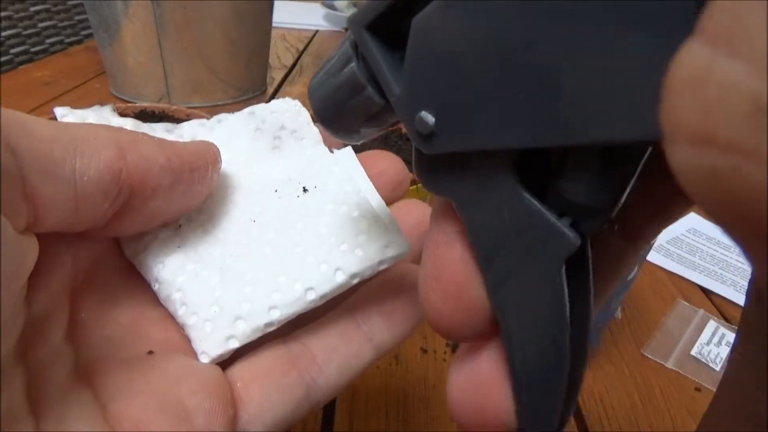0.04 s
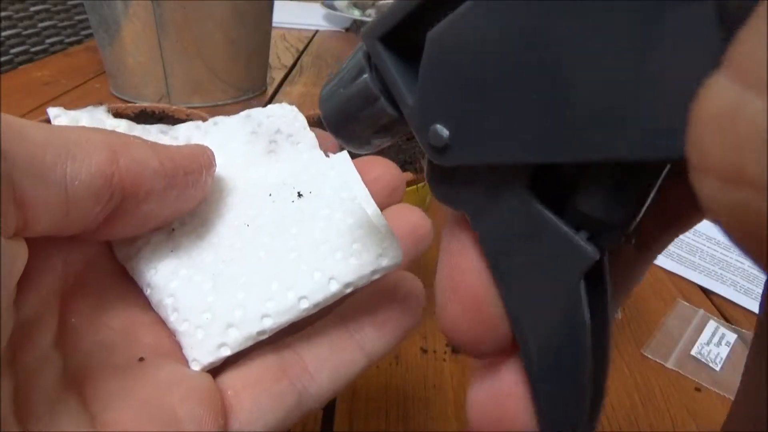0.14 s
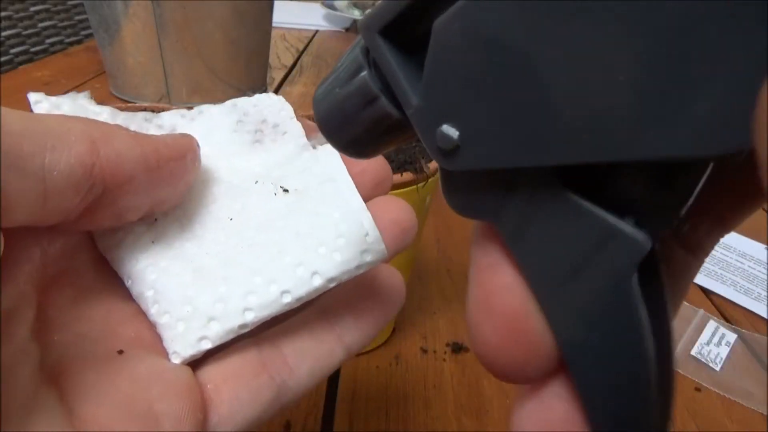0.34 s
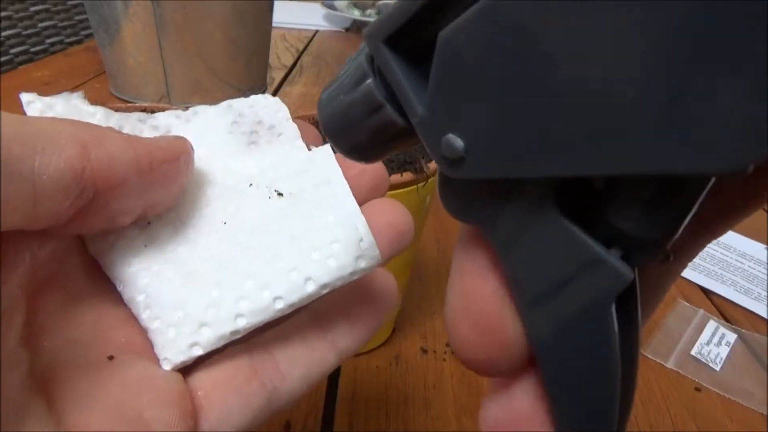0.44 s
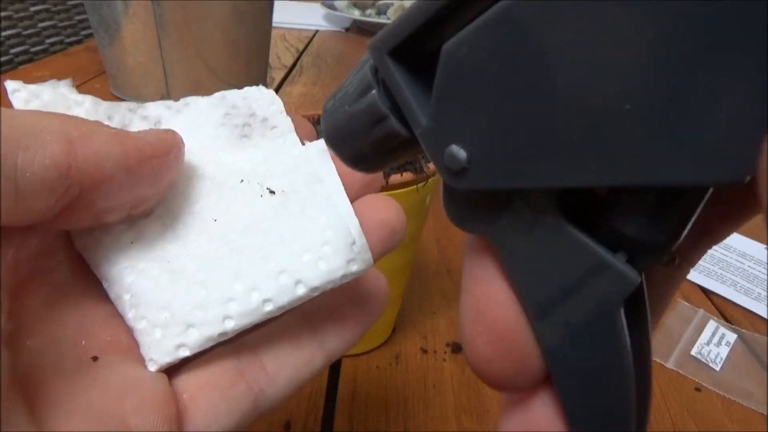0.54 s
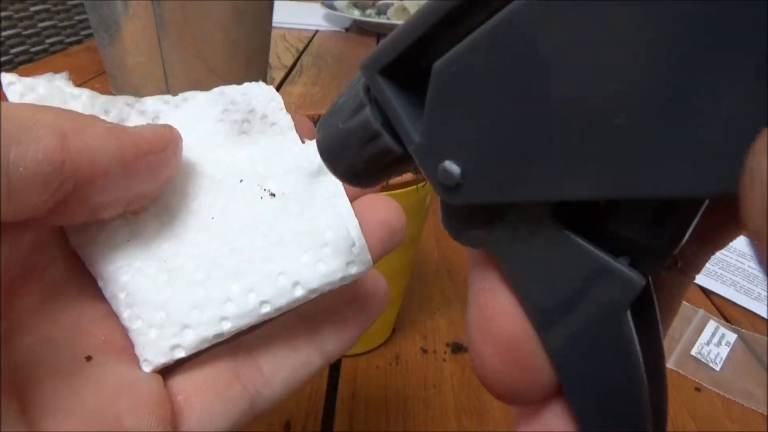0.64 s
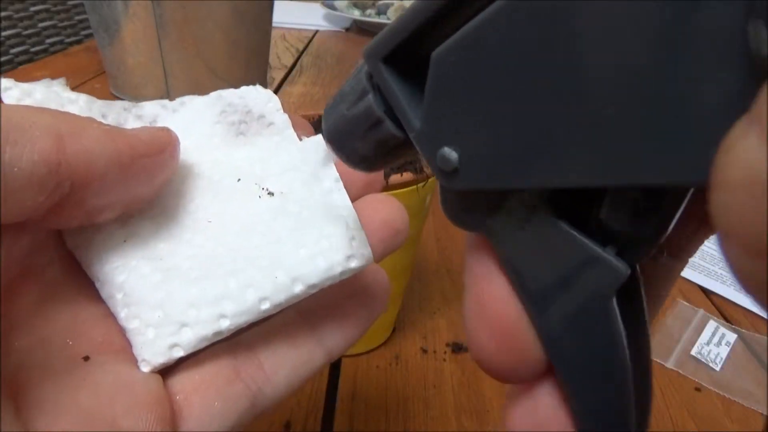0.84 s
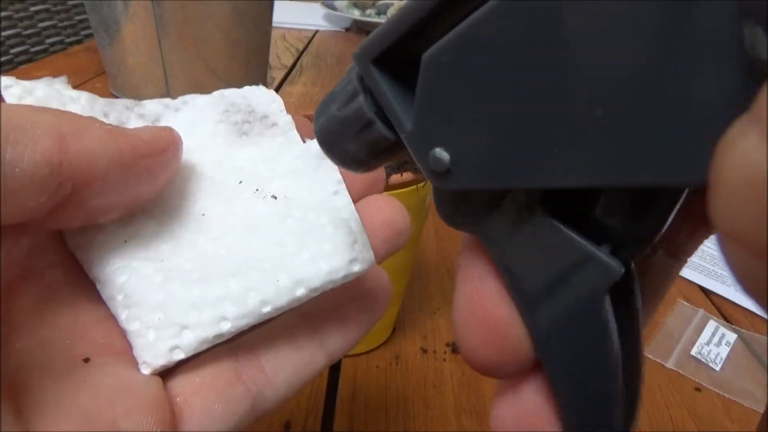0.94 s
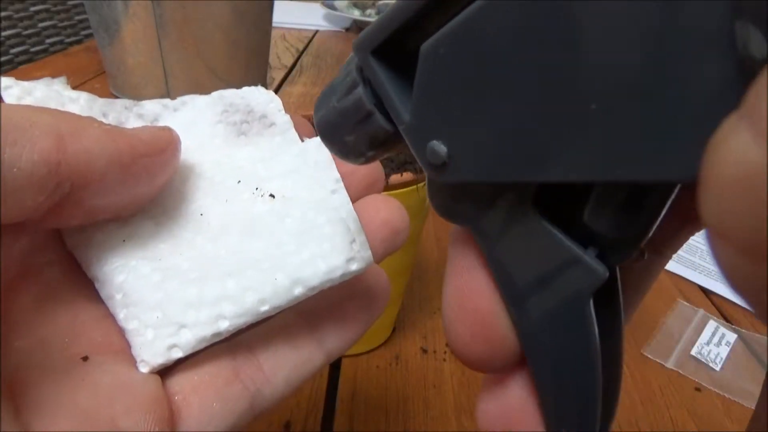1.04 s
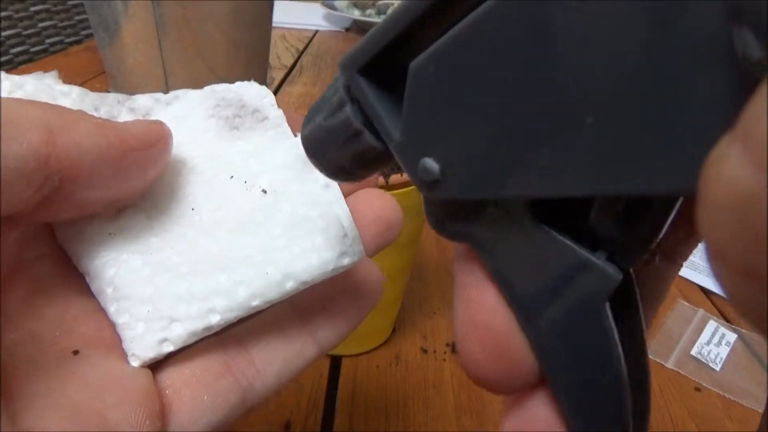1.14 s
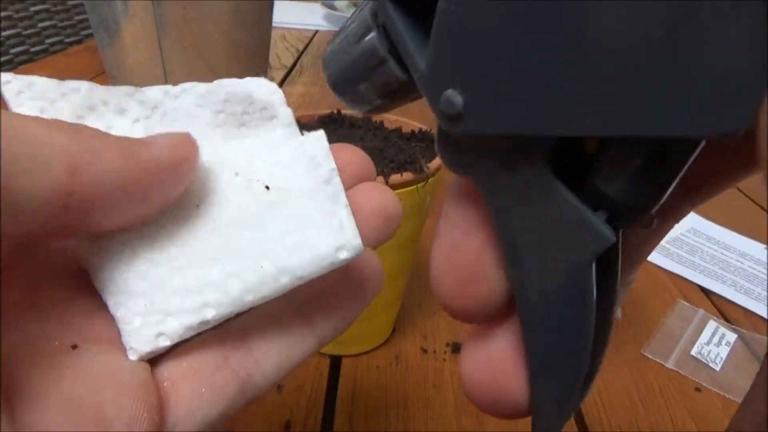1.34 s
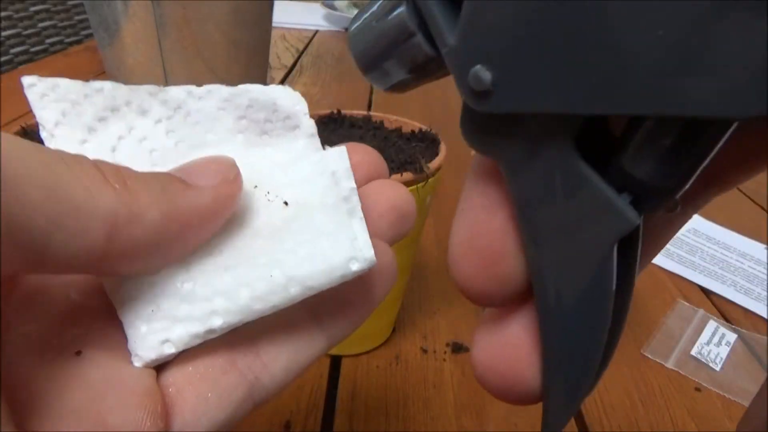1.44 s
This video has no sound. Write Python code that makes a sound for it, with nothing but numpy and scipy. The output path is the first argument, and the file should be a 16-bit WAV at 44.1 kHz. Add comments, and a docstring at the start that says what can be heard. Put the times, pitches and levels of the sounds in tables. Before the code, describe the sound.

A hand sprayer is pumped four times, close to the microphone, the first squirt strongest and longest; crisp mist hits paper towel, the trigger clicks and thumps back, ending with a brief chirp and faint refill hiss.

```python
"""Spray bottle onto a paper towel

Small room, close by: the hiss of an earlier squirt dies away, then a trigger bottle is pumped four times
at a paper towel. Pulls thump the piston (damped sines), spit (noise snaps) and hiss as droplet noise for
mist and patter. The plastic trigger rasps in noise bursts; at last it squeaks home as a sagging chirp of
partials and the pump sucks in water as soft noise. Faint reverberation and room tone lie behind."""
import sys
import numpy as np
from scipy import signal
from scipy.io import wavfile
from scipy.ndimage import uniform_filter1d

SR = 44100
rng = np.random.default_rng(int(sys.argv[2]) if len(sys.argv) > 2 else 0)


def transcribe(signal):
    """Save signal, clipped to [-1, 1], as a 16-bit WAV file at the path in sys.argv[1]."""
    frames = np.atleast_2d(signal).T
    limited = np.clip(frames, -1, 1)
    pcm = np.round(limited * 32767).astype(np.int16)
    wavfile.write(sys.argv[1], SR, pcm)


N = 66150
T = np.arange(N) / SR
ONSET_S = 0.00073
CLICK_DECAY_S = 0.0024


def amp(db):
    """Decibels to gain."""
    return 10 ** (np.asarray(db) / 20)


def unit(x):
    """Scales to rms 1."""
    return x / np.sqrt(np.mean(x ** 2) + 1e-20)


def noise():
    """White noise of rms 1."""
    return rng.standard_normal(N)


def random_signs():
    """Flat-spectrum noise of constant size and random sign."""
    return rng.choice([-1, 1], N)


def colour(x, points, keep_power=True):
    """Minimum-phase filter through (frequency [Hz], level [dB]) points."""
    hz, db = np.transpose(points)
    bins_hz = abs(np.fft.fftfreq(4096, 1 / SR)) + 1
    gain = amp(np.interp(np.log(bins_hz), np.log(hz), db))
    if keep_power:
        gain = unit(gain)
    # The Hilbert transform of the log gain gives the phase of a causal filter
    response = np.exp(np.conj(signal.hilbert(np.log(gain))))
    taps = np.fft.ifft(response).real[:2048]
    return signal.oaconvolve(x, taps)[:N]


def swell(start, rise, hold, fall_db_per_s, open_db):
    """Flow that opens at open_db, rises to full, holds and falls away."""
    t = T - start
    rise_db = open_db * np.clip(1 - t / rise, 0, 1) ** 1.17
    fall_db = fall_db_per_s * np.maximum(t - rise - hold, 0)
    return np.clip(t / 0.002, 0, 1) * amp(rise_db - fall_db)


def burst(start, hold, decay):
    """Quick onset, short hold, exponential decay."""
    t = T - start
    return np.clip(t / ONSET_S, 0, 1) * np.exp(-np.maximum(t - hold, 0) / decay)


def ring(start, modes):
    """Damped modes struck once, each with its own t60 and a random phase."""
    t = np.maximum(T - start, 0)
    total = 0
    for hz, db, t60 in modes:
        total = total + amp(db - 60 * t / t60) * np.sin(2 * np.pi * (hz * t + rng.random()))
    return np.minimum(t / .0003, 1) * total


DROPS_PER_S, DROP_SPREAD_DB, DROP_SHARE, FLUTTER_DB = 6000, 3.5, 0.37, 1.0  # share is of power


def droplets():
    """Smooth hiss with dense impacts of uneven size, fluttering with the flow."""
    impacts = (rng.random(N) < DROPS_PER_S / SR) * random_signs()
    drops = impacts * amp(DROP_SPREAD_DB * np.minimum(rng.exponential(1, N), 4))
    flutter = unit(uniform_filter1d(noise(), size=200))
    mixture = np.sqrt(DROP_SHARE) * unit(drops) + np.sqrt(1 - DROP_SHARE) * noise()
    return mixture * amp(FLUTTER_DB * flutter)


# Pulls: (start [s], rise [s], hold [s], mist level [dB], mist fall [dB/s],
#         patter lag [s], patter level [dB], patter fall [dB/s])
SQUIRTS = [(0.212, 0.04, 0.082, -17, 251, .006, -22.5, 157),
           (0.589, 0.035, 0.046, -26.5, 235, 0.012, -25.5, 300),
           (0.847, 0.049, 0.033, -21, 235, 0.02, -23.5, 210),
           (1.107, 0.035, 0.03, -24, 210, .014, -25.5, 282)]
# Spectrum of mist at the nozzle: (frequency [Hz], level [dB])
MIST_SPECTRUM = [(300, -56), (3000, -11), (6500, -11.5), (8200, -11), (9200, -4), (10200, -2), (11800, 0.5),
                 (13200, -2), (14100, -1.5), (15000, -6.5), (16000, -18)]
# Spectrum of drops on the paper: (frequency [Hz], level [dB])
PATTER_SPECTRUM = [(60, -23), (170, -17), (350, -8), (900, -5.5), (2000, -4), (2650, 0), (3100, -2.5),
                   (3600, 1.5), (4250, 1.5), (5000, -7), (5800, -8), (6700, -20), (7900, -4.5),
                   (10000, -22), (16000, -14.5)]
# Spectrum of sputter and of the spits below: (frequency [Hz], level [dB])
SPIT_SPECTRUM = [(60, -36), (200, -21), (2000, -8.5), (4300, -9), (6500, -24), (9500, -3), (12500, 7.5),
                 (14500, 1.5), (16000, -4)]
MIST_OPEN_DB, PATTER_OPEN_DB = -28.5, -22.5  # opening level, relative to full flow
PATTER_RISE_SHARE = 0.71  # of the mist's rise time
VALVE_TAIL_S, VALVE_SHUT_S = 0.092, 0.022  # extra time open, then the decay
SPUTTER_PER_S, SPUTTER_DB, SPUTTER_DECAY_S, SPUTTER_FALL_DB_PER_S = 130, -16, .0007, 110


def spray():
    """Pump pressure drives bright mist at the nozzle and patter on paper; the weakening jet sputters."""
    mist, patter, weak_jet = 0, 0, 0
    for start, rise, hold, mist_db, mist_fall, lag, patter_db, patter_fall in SQUIRTS:
        valve = burst(start, rise + hold + VALVE_TAIL_S, VALVE_SHUT_S)
        mist_flow = swell(start, rise, hold, mist_fall, MIST_OPEN_DB)
        mist = mist + valve * amp(mist_db) * mist_flow
        landing = swell(start + lag, rise * PATTER_RISE_SHARE, hold, patter_fall, PATTER_OPEN_DB)
        patter = patter + valve * amp(patter_db) * landing
        # Slower fall than the mist, so the sputter outlasts it
        weak_flow = swell(start, rise + hold, 0, SPUTTER_FALL_DB_PER_S, MIST_OPEN_DB)
        weak_jet = weak_jet + valve * amp(mist_db + SPUTTER_DB) * weak_flow
    hiss = colour(mist * droplets(), MIST_SPECTRUM) + colour(patter * droplets(), PATTER_SPECTRUM)
    strikes = 1. * (rng.random(N) < SPUTTER_PER_S / SR)
    sputter = signal.lfilter([1], [1, -np.exp(-1 / (SPUTTER_DECAY_S * SR))], strikes)
    return hiss + colour(weak_jet * sputter * noise(), SPIT_SPECTRUM)


# Large drops spat from the nozzle, and other wet snaps: (time [s], level [dB], decay [s])
SPITS = [(.168, -21.5, 0.00084), (0.2111, -18.5, .001), (0.233, -16, .002), (.3527, -7.5, 0.0015),
         (0.3621, -19, 0.00087), (0.368, -14, .0012), (0.392, -15, .001), (.405, -26, 0.0015),
         (.4605, -37, 0.00091), (0.559, -34, .001), (0.5936, -17.5, .002), (.603, -29, 0.0063),
         (.724, -28, 0.0013), (0.7581, -16, 0.00067), (.859, -7.5, 0.00093), (.868, -15, 0.00075),
         (0.97, -22, 0.0016), (1.138, -20, 0.0026), (1.2293, -24, 0.0014), (1.2384, -27, .001),
         (1.2487, -12.5, 0.00086), (1.394, -22, .0014)]


def spits():
    """Large drops and other wet snaps: very short bursts of bright noise."""
    snaps = sum(amp(db) * burst(start, ONSET_S, decay) for start, db, decay in SPITS)
    return colour(snaps * random_signs(), SPIT_SPECTRUM)


# Piston reaching the ends of its travel: (time [s], level [dB], pitch [Hz], decay [s])
THUMPS = [(.163, -38, 218, .012), (0.197, -28.5, 260, .003), (0.395, -35, 200, 0.0044),
          (.587, -22, 235, 0.0021), (.751, -26.5, 201, 0.0026), (.863, -28.5, 192, 0.013),
          (0.8734, -29.5, 152, 0.011), (.994, -27, 200, .003), (1.112, -25, 224, 0.0044),
          (1.241, -26, 225, 0.0029), (1.397, -35.5, 178, 0.012)]
# Body of the bottle: (frequency [Hz], level [dB])
BOTTLE_BODY = [(30, -4.5), (70, 0.5), (140, -1.5), (250, 0.5), (500, 0), (1500, -13)]
THUMP_RISE_S, THUMP_SLOSH = 0.00088, 0.35  # slosh is relative to the tone


def piston():
    """Low thumps of the bottle, damped sines roughened by the water in it."""
    low_pass = signal.butter(2, 400, fs=SR, output="sos")
    slosh = unit(signal.sosfilt(low_pass, noise()))
    thumps = 0
    for start, db, hz, decay in THUMPS:
        t = np.maximum(T - start, 0)
        envelope = np.minimum(t / THUMP_RISE_S, 1) * np.exp(-t / decay)
        tone = np.sin(2 * np.pi * hz * t)
        thumps = thumps + amp(db) * envelope * (tone + THUMP_SLOSH * slosh)
    return colour(thumps, BOTTLE_BODY, keep_power=False)


# Clicks and rasps of the trigger: (time [s], level [dB], length of the slip [s])
CLICKS = [(0.1667, -30, 0.00092), (0.1928, -34, 0.0011), (0.2007, -28.5, 0.0051), (0.4034, -22.5, .001),
          (0.4109, -22, 0.0025), (0.5578, -36, 0.0006), (0.755, -26.5, 0.0021), (0.763, -23, 0.0063),
          (0.78, -38.5, 0.0083), (0.799, -38, .001), (0.804, -37, 0.00086), (.859, -21, 0.00079),
          (0.867, -21.5, 0.00083), (0.9799, -26.5, 0.00044), (1.0018, -23, 0.0013), (1.0092, -21.5, 0.0059),
          (1.024, -37, 0.0016), (1.045, -29, 0.0017), (1.115, -26, .001), (1.2477, -24, 0.0026),
          (1.2547, -21.5, 0.0065)]
# Dull taps of the grip: (time [s], level [dB])
TAPS = [(0.053, -20.5), (0.1006, -23.5), (.405, -24), (.515, -37), (.593, -28), (1.121, -25.5),
        (1.357, -30.5), (1.395, -32)]
# Resonances of the grip: (frequency [Hz], level [dB], t60 [s])
TAP_MODES = [(450, -15, .006), (900, -17, 0.0045), (1290, 3, 0.0087), (1820, -13, 0.0045)]
# Resonances of the spring: (frequency [Hz], level [dB], t60 [s])
PING_MODES = [(2770, 1, .019), (3610, -2.5, 0.022), (5373, -1, 0.018), (7040, -7, .014), (9500, -18, .011),
              (11620, -1, 0.0099), (12700, -10, .011)]
# Spectrum of plastic slipping on plastic, also in the squeak: (frequency [Hz], level [dB])
PLASTIC_SPECTRUM = [(150, -13.5), (700, -8.5), (1800, -9), (2600, -0.5), (3400, -5.5), (4400, 1.5),
                    (5300, -6), (7800, -9), (9000, -5), (11500, -8.5), (13500, -14), (16000, -18)]
PING_S, PING_DB, PING_SCRAPE_S, PING_SCRAPE_DB = .0798, -23, 0.0026, -30.5


def trigger():
    """Plastic slips on plastic; the grip taps and the spring scrapes and pings."""
    slips = sum(amp(db) * burst(start, length, CLICK_DECAY_S) for start, db, length in CLICKS)
    spring_scrape = amp(PING_SCRAPE_DB) * burst(PING_S, PING_SCRAPE_S, CLICK_DECAY_S)
    taps = sum(amp(db) * ring(start, TAP_MODES) for start, db in TAPS)
    rasp = colour((slips + spring_scrape) * random_signs(), PLASTIC_SPECTRUM)
    return rasp + taps + amp(PING_DB) * ring(PING_S, PING_MODES)


# Partials of the squeak: (frequency ratio [1], level [dB])
SQUEAK_PARTIALS = [(1, -2), (1.25, -7.5), (1.88, -0.5), (2.8, -12), (3.5, -9.5), (3.8, -15), (4.5, -17),
                   (5.6, -14)]
SQUEAK_S, SQUEAK_LENGTH_S, SQUEAK_DB, SQUEAK_FADE_DB_PER_S = 1.2763, 0.01, -10, 1700
SQUEAK_HZ, SQUEAK_SAG_HZ_PER_S, SQUEAK_JITTER = 2212, 31000, 0.0894  # jitter: rms share of pitch
SQUEAK_SCRAPE_DB = -22  # before the squeak's own level


def squeak():
    """A very short, rough stick-slip chirp that sags and fades as the trigger comes home."""
    t = np.clip(T - SQUEAK_S, 0, 2 * SQUEAK_LENGTH_S)
    jitter = SQUEAK_JITTER * unit(uniform_filter1d(noise(), size=6))
    hz = (SQUEAK_HZ - SQUEAK_SAG_HZ_PER_S * t) * (1 + jitter)
    turns = np.cumsum(hz) / SR
    tone = 0
    for ratio, db in SQUEAK_PARTIALS:
        tone = tone + amp(db) * np.sin(2 * np.pi * (ratio * turns + rng.random()))
    scrape = amp(SQUEAK_SCRAPE_DB) * colour(noise(), PLASTIC_SPECTRUM)
    fade = amp(SQUEAK_DB - SQUEAK_FADE_DB_PER_S * t)
    return (tone + scrape) * fade * burst(SQUEAK_S, SQUEAK_LENGTH_S, CLICK_DECAY_S)


# Soft hisses, the dying tail of an earlier squirt and then water drawn into the pump:
# (start [s], rise [s], hold [s], fall [dB/s], level [dB])
SOFT_HISSES = [(-.06, 0.029, 0.028, 234, -42), (1.251, .145, 0.069, 214, -37.5)]
# Spectrum of the soft hisses: (frequency [Hz], level [dB])
SOFT_HISS_SPECTRUM = [(100, -13.5), (500, -10), (2000, -7.5), (2700, -4), (3600, -1.5), (5000, -9),
                      (5800, -8), (6700, -14), (9000, -12.5), (11500, -8), (13500, -16), (16000, -27)]
SOFT_HISS_OPEN_DB = -6.5  # opening level, relative to full flow


def soft_hisses():
    """Soft hisses: the dying tail of an earlier squirt at the start, then water drawn into the pump."""
    flow = 0
    for start, rise, hold, fall, db in SOFT_HISSES:
        flow = flow + amp(db) * swell(start, rise, hold, fall, SOFT_HISS_OPEN_DB)
    return colour(flow * noise(), SOFT_HISS_SPECTRUM)


# Tint of the reverberation: (frequency [Hz], level [dB])
ROOM_COLOUR = [(100, -2), (1000, 4), (4000, -0.5), (8000, 4), (16000, -20)]
ROOM_DB, ROOM_T60_S = -22.5, .2


def room(x):
    """A faint short tail of decaying noise, different in each ear."""
    t = T[:SR // 3]
    # The first 3 ms are silent
    tails = rng.standard_normal((2, len(t))) * amp(-60 * t / ROOM_T60_S) * (t > .003)
    tails = tails / np.linalg.norm(tails[0])
    tinted = colour(x, ROOM_COLOUR, keep_power=False)
    return amp(ROOM_DB) * signal.fftconvolve(tinted[None], tails, axes=1)[:, :N]


# Spectrum of the room tone: (frequency [Hz], level [dB])
ROOM_TONE = [(15, -40), (25, -9.5), (105, -2), (242, -2.5), (463, -5), (714, -7.5), (911, -6.5),
             (1070, -10), (1700, -7), (2000, -13), (2280, -10.5), (7110, -16.5), (16000, -18.5)]
ROOM_TONE_DB = -46.5


def air():
    """Quiet room tone: steady coloured noise."""
    return amp(ROOM_TONE_DB) * colour(noise(), ROOM_TONE)


def spread(source, width):
    """Plays a source as middle and, with fresh random detail, as side."""
    middle = source()
    side = colour(source(), width, keep_power=False)
    return middle + np.array([[1], [-1]]) * side


# Stereo width, as the side level of each source: (frequency [Hz], level [dB])
SPRAY_WIDTH = [(60, -22), (300, -19), (750, -20), (2000, -39), (3300, -29), (4800, -10.5), (7000, -13.5),
               (9000, -18.5), (12000, -26), (15000, -29)]
TRIGGER_WIDTH = [(100, -11), (1000, -7.5), (2200, -3.5), (4000, -8.5), (8000, -6), (12000, -14),
                 (16000, -15)]
SOFT_HISS_WIDTH = [(100, -10), (900, -5), (2400, -14), (6000, -10), (12000, -25)]
AIR_WIDTH = [(60, -18), (150, -13), (380, -4), (950, -3), (2400, -2.5), (6000, -8.5), (15000, -30)]


def scene():
    """The jet is narrow and central; the plastic parts and the room sound wider."""
    bottle = spread(spray, SPRAY_WIDTH) + spread(soft_hisses, SOFT_HISS_WIDTH)
    for part in (spits, trigger, squeak):
        bottle = bottle + spread(part, TRIGGER_WIDTH)
    return bottle + piston() + room(bottle.mean(0)) + spread(air, AIR_WIDTH)


def record(dry):
    """The microphone channel's band limit: a steep low-pass at 15.8 kHz."""
    low_pass = signal.firwin(511, 15800, window=("kaiser", 9), fs=SR)
    return signal.oaconvolve(dry, low_pass[None], "same")


dry = scene()
out = record(dry)
transcribe(out)
```